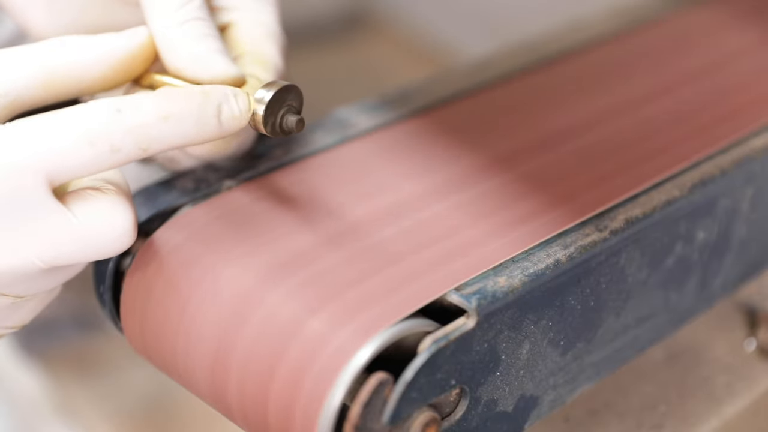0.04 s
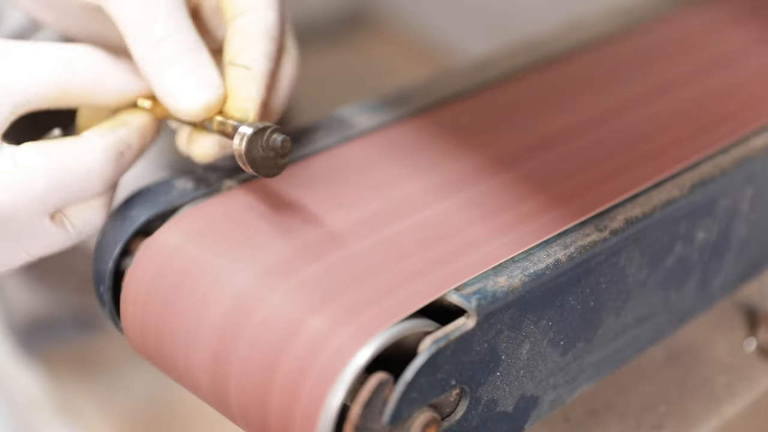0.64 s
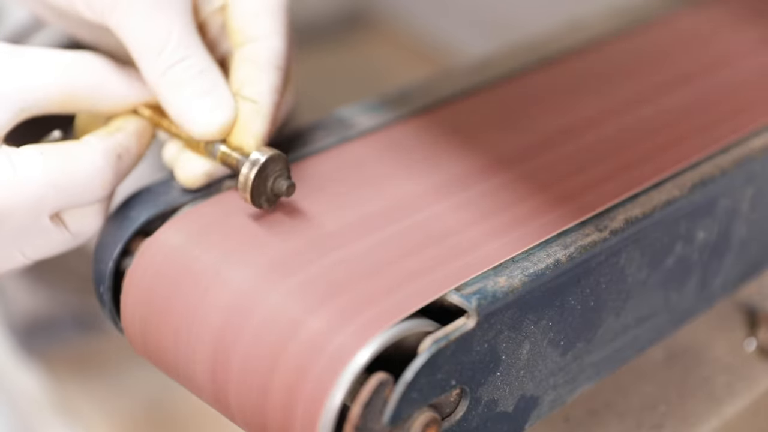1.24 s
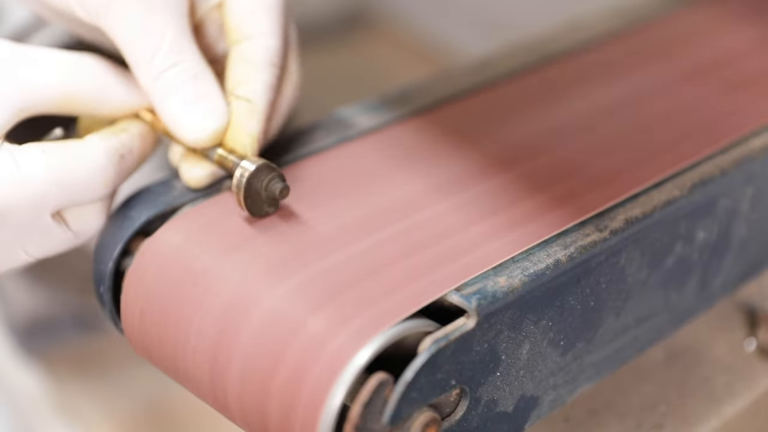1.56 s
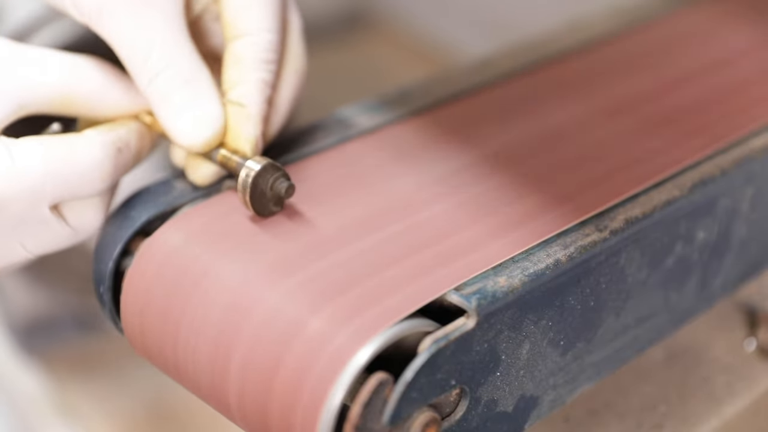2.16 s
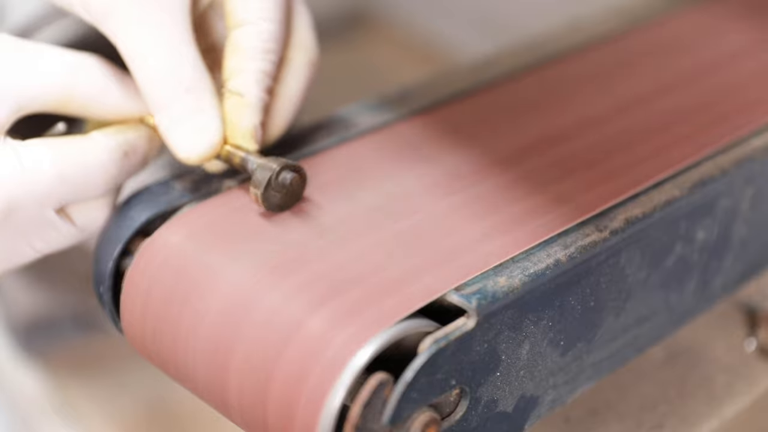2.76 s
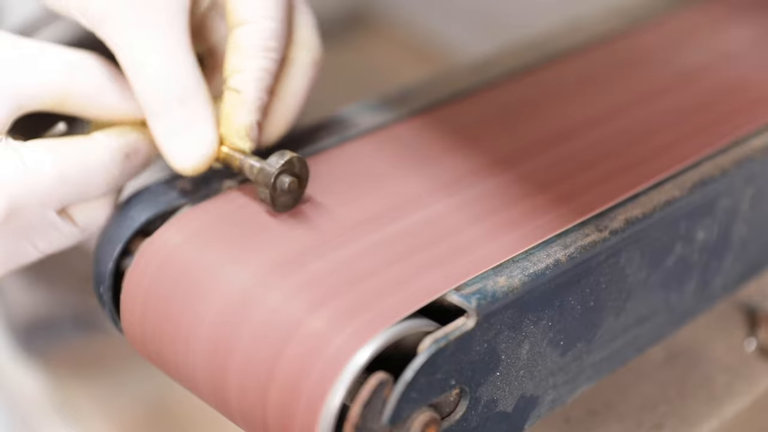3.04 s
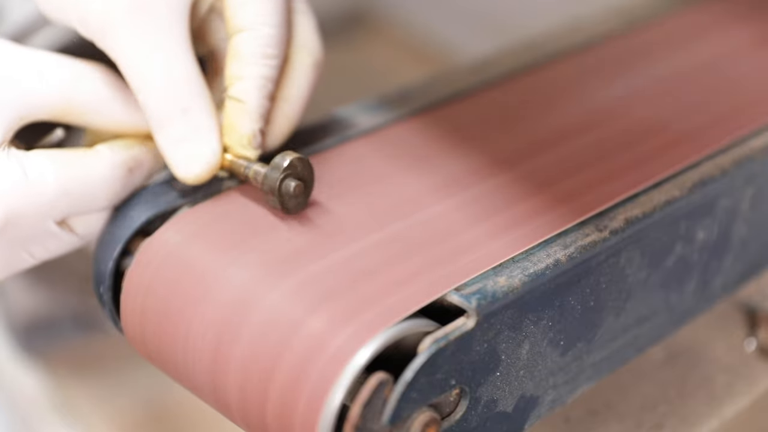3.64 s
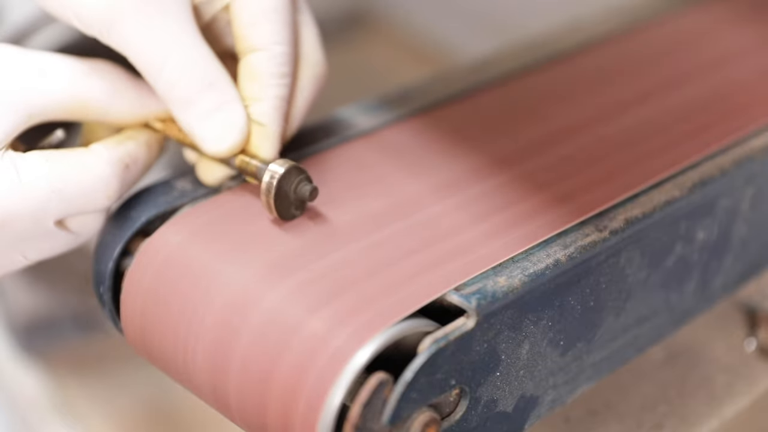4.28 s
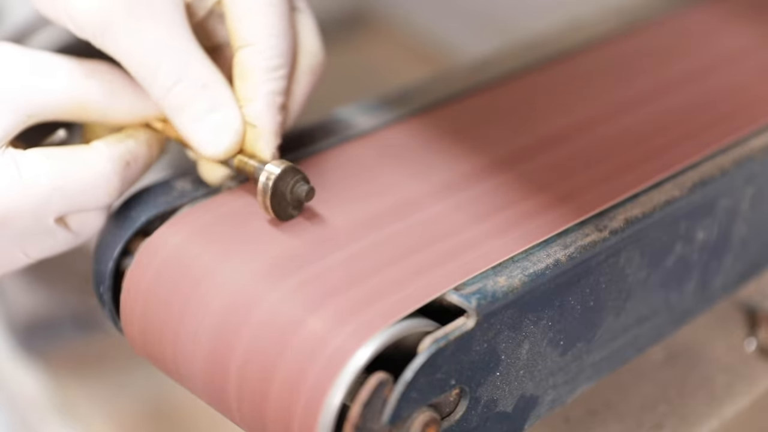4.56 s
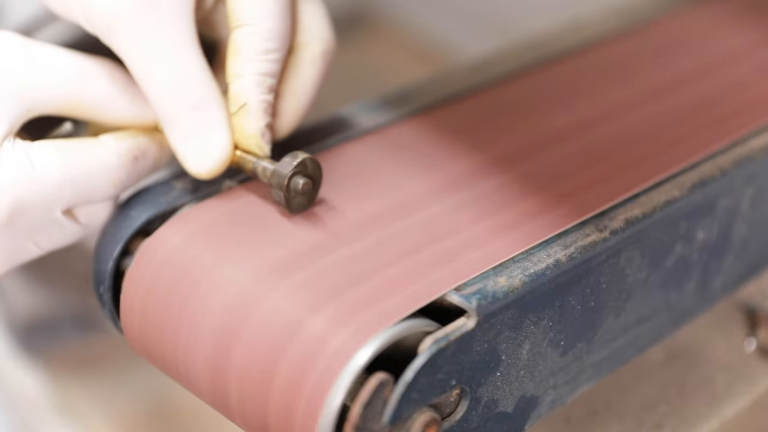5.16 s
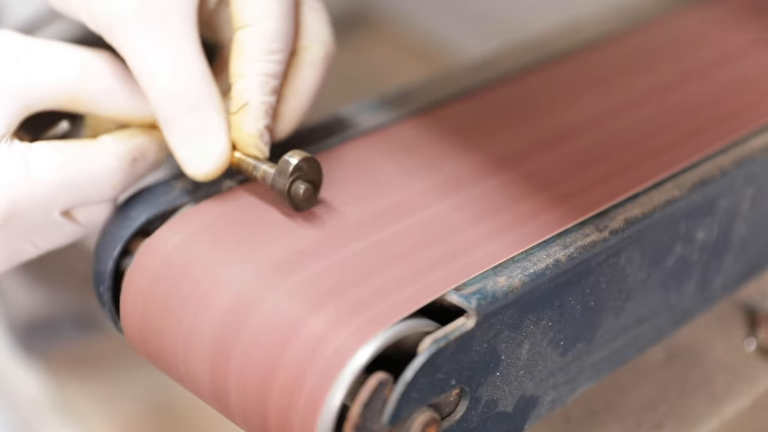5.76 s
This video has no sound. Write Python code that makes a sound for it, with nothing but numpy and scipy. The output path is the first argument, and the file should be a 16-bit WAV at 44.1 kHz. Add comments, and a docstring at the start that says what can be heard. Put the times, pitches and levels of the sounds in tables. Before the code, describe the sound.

A belt sander runs with a rapid, rattling knock over a rushing belt, then a small brass part grinds against it with a bright hiss.

```python
"""Knocking flaps, about eight a second, from the slack drive belt of a bench belt sander in a small workshop.
Each flap is a short run of knocks in step with the drum; they thump the frame and clack the steel guard,
and a loose fitting chinks after them. Under this the sanding belt rushes over rollers and platen.
From about 2.3 s a small brass part is held on the belt and turned; grit scrapes it with a bright hiss."""
import sys
import numpy as np
from scipy import signal
from scipy.fft import rfft, irfft, next_fast_len
from scipy.io import wavfile

SR = 44100
rng = np.random.default_rng(int(sys.argv[2]) if len(sys.argv) > 2 else 0)


def to_wav(sig):
    """Store sig (one row per channel, or 1-D mono) as 16-bit WAV at the path in sys.argv[1].

    Samples outside -1..1 are clipped; the rate is SR.
    """
    pcm = np.clip(np.atleast_2d(sig), -1, 1) * 32767
    pcm = np.round(pcm).astype(np.int16)
    wavfile.write(sys.argv[1], SR, pcm.T)  # frames by channels


N = 265261
TIME_S = np.arange(N) / SR
LAP_HZ, DRUM_HZ, IDLER_HZ = 8.2, 21.04, 116.7  # turn rates: belt, drum, small roller

# steel guard and platen resonances: freq_hz, width_hz, boost_db
STEEL_PEAKS = [(676, 29, 5), (724, 27, 8), (791, 22, 5), (937, 34, 11), (982, 37, 7), (1028, 34, 9),
               (1135, 60, 5), (1253, 25, 4), (1410, 52, 5), (1557, 28, 5), (1775, 28, 5), (1974, 30, 3),
               (2578, 90, 3), (2699, 22, 5), (2848, 84, 5), (2978, 57, 7), (3194, 90, 5), (3462, 38, 6),
               (3626, 28, 11), (3880, 55, 6), (4194, 70, 4), (4846, 90, 7)]


def drive_blows(end_db=-8, clear_db=-8.5, pull=.145):
    """The drum times the knocks, the slack belt's swing sets their force. Returns start_s, level_db."""
    # drive belt flaps: middle_s, length_s, strength_db
    flaps = [(0.043, 0.062, -17), (0.169, 0.073, -16), (0.312, 0.062, -19.5), (0.426, 0.049, -16.5),
             (0.552, 0.042, -13), (0.653, 0.034, -15), (0.771, 0.11, -18), (0.923, 0.036, -14.5),
             (1.022, 0.074, -15.5), (1.157, 0.11, -19), (1.284, 0.049, -20.5), (1.4, 0.075, -16.5),
             (1.546, 0.06, -17.5), (1.686, 0.04, -15.5), (1.797, 0.061, -15), (1.939, 0.034, -12),
             (2.04, 0.065, -18), (2.163, 0.15, -19.5), (2.301, 0.11, -19.5), (2.414, 0.031, -9.5),
             (2.53, 0.03, -20), (2.659, 0.066, -19.5), (2.784, 0.057, -16), (2.89, 0.037, -19),
             (3.007, 0.081, -24), (3.114, 0.1, -19), (3.243, 0.095, -24.5), (3.363, 0.056, -14.5),
             (3.487, 0.025, -18), (3.598, 0.039, -14), (3.72, 0.02, -19.5), (3.844, 0.093, -24),
             (3.948, 0.044, -20), (4.059, 0.083, -19), (4.167, 0.05, -17.5), (4.299, 0.046, -19),
             (4.415, 0.078, -21.5), (4.512, 0.066, -19.5), (4.612, 0.06, -19), (4.736, 0.075, -18),
             (4.875, 0.04, -19), (4.981, 0.11, -25), (5.102, 0.038, -22), (5.191, 0.068, -22),
             (5.313, 0.14, -18.5), (5.432, 0.078, -21.5), (5.544, 0.051, -23), (5.671, 0.033, -23),
             (5.883, 0.083, -18), (6.008, 0.1, -19)]
    # two knocks per drum turn: offset_s, accent_db
    turn_knocks = [(.0071, 1.5), (0.0265, -5)]
    middle_s, length_s, strength_db = np.transpose(flaps)
    turns_s = np.arange(0, N / SR + 1 / DRUM_HZ, 1 / DRUM_HZ)
    start_s, level_db = [], []
    for offset_s, accent_db in turn_knocks:
        due_s = turns_s + offset_s
        nearest = abs(due_s[:, None] - middle_s).argmin(1)
        to_middle_s = middle_s[nearest] - due_s
        swing_db = end_db * (2 * to_middle_s / length_s[nearest]) ** 2
        miss_db = 2 * np.minimum(swing_db - clear_db, 0)  # a small swing clears the frame
        start_s.append(due_s + pull * to_middle_s)
        level_db.append(strength_db[nearest] + accent_db + swing_db + miss_db)
    return np.concatenate(start_s), np.concatenate(level_db)


def knocks(cushion_s=0.0034, mode_scatter=0.42):
    """Each knock thumps the frame modes, the upper ones in a changing mix, and clacks the guard."""
    # frame modes: freq_hz, level_db, t60_s
    frame_modes = [(78, -9, 0.099), (164, -9.5, 0.39), (173.3, 2.5, 0.14), (228.5, -4, 0.17),
                   (255, -3, 0.11), (293.2, -3, 0.1), (310, -32, 0.027), (434, -18.5, 0.15),
                   (454.7, -11, 0.32), (535, -23, 0.12)]
    # guard spectrum: freq_hz, gain_db
    clack_colour = [(200, -41), (400, 5.5), (600, -2.5), (900, -4), (1300, 0), (1850, 2.5), (2350, -3),
                    (3100, -17.5), (4500, -19.5), (5500, -29.5), (9000, -42), (16000, -44)]
    start_s, level_db = drive_blows()
    t = np.arange(SR // 4) / SR
    modes = np.array([amp(db - 60 * t / t60) * np.cos(2 * np.pi * hz * t) for hz, db, t60 in frame_modes])
    modes *= 1 - 0.29 * np.exp(-t / cushion_s)  # rubber cushions the blow
    modes = butterworth(modes, [85, 620], "bandpass")
    upper = np.transpose(frame_modes)[0] > 200
    thumps = np.zeros(N)
    for s, db in zip(start_s, level_db):
        weights = 1 + mode_scatter * upper * rng.standard_normal(len(modes))
        add(thumps, s, -amp(db) * weights @ modes)
    buzz = chatter(start_s, level_db, rise_s=0.00057, t60_s=0.16)
    return amp(-4.5) * thumps + amp(-1) * body(buzz, clack_colour, STEEL_PEAKS)


def chinks(lag_s=.006, scatter_db=5.5):
    """The loose fitting buzzes on its high modes after each knock, now and then loudly."""
    # loud chinks: start_s, level_db
    loud_chinks = [(0.197, -30.5), (0.3347, -26), (0.5394, -27), (0.5647, -25.5), (0.773, -31),
                   (0.937, -27.5), (1.2947, -30), (1.319, -24), (1.3928, -28.5), (1.677, -29.5),
                   (1.8193, -33.5), (1.943, -33), (2.1985, -30), (2.2933, -31), (2.3343, -24),
                   (2.6767, -27), (2.7737, -27), (3.246, -27), (3.378, -23.5), (3.487, -28.5), (5.198, -25),
                   (5.4418, -26)]
    # fitting spectrum: freq_hz, gain_db
    fitting_colour = [(1500, -30.5), (3000, 7.5), (4700, -4), (5500, -2.5), (6600, 3.5), (8300, -1),
                      (10000, 0.5), (11500, -18), (16000, -45)]
    # fitting resonances: freq_hz, width_hz, boost_db
    fitting_peaks = [(2980, 60, 8), (3626, 30, 11), (4880, 60, 8), (5930, 40, 7), (6120, 40, 10),
                     (6310, 50, 8), (7320, 55, 11), (7620, 100, 5), (8270, 45, 6), (9510, 80, 9),
                     (9850, 40, 7)]
    start_s, knock_db = drive_blows()
    level_db = knock_db - 17 + scatter_db * rng.standard_normal(len(start_s))
    contacts = np.vstack([np.c_[start_s + lag_s, level_db], loud_chinks])
    buzz = chatter(*contacts.T, rise_s=0.00095, t60_s=0.1)
    return amp(2.5) * body(buzz, fitting_colour, fitting_peaks)


def grinding(touch_s=1.96, seated_s=2.3, judder_db=1.5, tremor_db=0.73, idler_depth=.06):
    """Grains cut the brass; hand pressure sets the level, the part's angle the colour."""
    # brass on the belt: time_s, press_db, edge_db, flat_db (last two relative to press_db)
    contact = [(2.1, -43.5, 1, 1), (2.36, -35, -3.5, 3.5), (2.46, -28, -3, 2.5), (2.55, -30.5, -5.5, -3.5),
               (2.84, -35.5, -2, -1), (3.08, -29, -4, -4), (3.3, -33.5, -1.5, -6), (3.51, -38, -2, 6.5),
               (3.67, -33.5, -3, -2), (3.88, -33, 0.5, 1), (4.11, -37.5, 1, 3.5), (4.22, -34.5, 2.5, -1),
               (4.43, -32, 2, -4), (4.72, -32, 1, 0), (4.81, -33, -2, -0.5), (5.24, -34.5, 2.5, 2.5),
               (5.32, -36, -4, 5.5), (5.53, -36.5, -2.5, 7), (5.67, -40, 0, 5), (5.74, -34, 1, 1.5),
               (5.9, -35.5, -3.5, 6), (6.01, -34, 2.5, 1)]
    # spectra of scrape, edge hiss, rasp of the flat, fine grit: freq_hz, gain_db
    scrape_colour = [(4000, -16.5), (5600, -7), (6200, -1), (7250, 1), (7900, -2.5), (8600, -3),
                     (10000, -27), (16000, -22)]
    edge_colour = [(7000, -20), (8500, -15), (9100, 9), (9700, 6), (10800, 8.5), (11800, 4.5), (13000, -2),
                   (15500, -30)]
    rasp_colour = [(600, -25.5), (1200, 5.5), (2000, 2), (2600, 1.5), (3100, -3), (3700, -3), (4600, -4.5),
                   (5600, -8), (7000, -9.5), (16000, -47)]
    fizz_colour = [(4000, -4), (6000, -4), (9000, -8), (12000, 6), (13500, 5), (15500, -17)]
    # resonances of brass on belt, and of the pressed platen: freq_hz, width_hz, boost_db
    brass_peaks = [(6109, 120, 6), (6425, 150, 3), (6772, 150, 6), (7120, 130, 5), (7314, 70, 7),
                   (7700, 170, 5), (8399, 150, 4), (9105, 170, 7), (9511, 70, 7), (10050, 180, 6),
                   (10538, 70, 6), (10913, 120, 6), (11657, 170, 3)]
    platen_peaks = [(1135, 54, 6), (1403, 52, 5), (2010, 70, 6), (2540, 70, 6), (2840, 70, 5),
                    (2970, 70, 7), (3170, 90, 8), (3470, 50, 7), (3626, 30, 8), (3880, 45, 10),
                    (4170, 60, 8), (4580, 70, 5), (4860, 70, 10), (5140, 80, 6)]
    time_s, *columns = np.transpose(contact)
    press_db, edge_db, flat_db = (np.interp(TIME_S, time_s, column) for column in columns)
    touch = np.interp(TIME_S, [touch_s, seated_s], [0, 1])
    bounce = amp(judder_db * wander(hz=71.5) + tremor_db * wander(hz=17))
    throb = 1 + idler_depth * sine(IDLER_HZ)
    cuts = grit(per_s=14000, spread_db=2.5) * touch * bounce * throb * amp(press_db)
    edge_cuts, flat_cuts, fine_cuts = cuts * rng.choice([-1., 1.], (3, N))  # same grains, random signs
    scrape = body(cuts, scrape_colour, brass_peaks)
    edge = body(edge_cuts * amp(edge_db), edge_colour, brass_peaks)
    rasp = body(flat_cuts * amp(flat_db), rasp_colour, platen_peaks)
    fizz = body(fine_cuts * amp(edge_db), fizz_colour, brass_peaks)
    return amp(-0.84) * scrape + amp(-1.65) * edge + amp(1) * rasp + amp(-13.5) * fizz


def belt(repeat_share=0.32, drum_depth=0.009, idler_depth=0.084, flutter_db=1.68):
    """The running belt rushes and throbs over the rollers, drags the platen into ringing, and hisses."""
    # belt drag on the platen: time_s, level_db
    load = [(0, -41), (.5, -40), (.8, -33.5), (1.25, -31.5), (1.55, -32.5), (2.1, -28.5), (2.75, -32.5),
            (3.25, -29.5), (3.55, -26.5), (3.8, -30.5), (4.5, -27.5), (5.0, -29), (5.3, -25), (5.55, -33),
            (5.8, -23.5), (6.01, -31.5)]
    # spectra of roller rush, platen ring, grit hiss: freq_hz, gain_db
    rush_colour = [(25, -42), (45, -31), (70, -13.5), (110, -6.5), (170, 1), (280, 2.5), (370, -7.5),
                   (600, 0.5), (1100, 0), (1900, -3.5), (2700, -10.5), (4000, -23.5), (5500, -38),
                   (16000, -37.5)]
    platen_colour = [(500, -18.5), (800, -41), (950, 0), (1070, -1.5), (1270, -7), (1500, -19.5),
                     (2100, -7), (3000, -21.5), (8000, -64)]
    hiss_colour = [(2500, -8.5), (4500, 0), (5500, -5.5), (6300, 1), (7200, 3), (8300, -1.5), (9800, 1.5),
                   (11000, -0.5), (13000, -8.5), (15500, -26)]
    throb = 1 + drum_depth * sine(DRUM_HZ) + idler_depth * sine(IDLER_HZ)
    lap_bumps = np.sqrt(repeat_share) * rng.standard_normal((2, round(SR / LAP_HZ)))  # recur each lap
    roll, drag = (
        throb * (np.resize(bumps, N) + np.sqrt(1 - repeat_share) * grit(per_s=6000, spread_db=2))
        for bumps in lap_bumps)
    rush = body(roll * amp(flutter_db * wander(hz=25)), rush_colour, STEEL_PEAKS)
    drag_db = np.interp(TIME_S, *np.transpose(load)) + 1.14 * wander(hz=12)
    ring = body(drag * amp(drag_db), platen_colour, STEEL_PEAKS)
    grains = grit(per_s=12000, spread_db=2.5) * amp(0.55 * wander(hz=40))
    hiss = body(grains, hiss_colour, peaks=[(7180, 70, 2.9), (9600, 70, 2.5)])
    return amp(-25.5) * rush + ring + amp(-39) * hiss


def early_echoes(x):
    """Close hard surfaces mirror the treble and comb it into metallic peaks."""
    # echoes off guard, bench and hands: delay_s, gain_db
    echoes = [(.0021, -20), (.0047, -19), (.0069, -19), (.0093, -21)]
    treble = butterworth(x, 1900, "highpass")
    out = np.zeros(N)
    for delay_s, gain_db in echoes:
        add(out, delay_s, amp(gain_db) * treble)
    return out


def workshop(x, tail_count=3, gap_s=.006):
    """Short diffuse room tail, longest in the bass, its colour slowly and steadily shifting."""
    # room decay: freq_hz, t60_s
    decay = [(150, 0.9), (1000, 0.16), (3000, 0.087), (10000, 0.19)]
    taps = rng.standard_normal((tail_count, SR // 3)) * (np.arange(SR // 3) > gap_s * SR)
    hz, t, spectra = signal.stft(taps, SR, nperseg=256)
    t60_s = log_interp(decay, hz)[:, None]
    tails = signal.istft(spectra * amp(-60 * t / t60_s), SR, nperseg=256)[1]
    tails /= np.linalg.norm(tails[0])
    phase_rad = np.pi * (0.916 * TIME_S + np.arange(tail_count)[:, None] / tail_count)
    crossfade = np.cos(phase_rad) * np.sqrt(2 / tail_count)
    return signal.oaconvolve(butterworth(x, 450, "highpass") * crossfade, tails, axes=1)[:, :N].sum(0)


def chatter(start_s, level_db, rise_s, t60_s):
    """Each contact buzzes: a dying burst of tiny rebounds."""
    t, out = np.arange(SR // 8) / SR, np.zeros(N)
    envelope = (1 - np.exp(-t / rise_s)) * amp(-60 * t / t60_s)
    for s, db in zip(start_s, level_db):
        add(out, s, amp(db) * envelope * rng.standard_normal(len(t)))
    return out


def grit(per_s, spread_db):
    """Tiny impacts of abrasive grains, a few larger than the rest; rms 1."""
    size = amp(spread_db * np.minimum(rng.exponential(1, N), 4))
    return unit_rms(size * rng.choice([-1., 1.], N) * (rng.random(N) < per_s / SR))


def body(x, colour, peaks, fft_size=8192):
    """Rings x through a unit-energy body: broad colour plus resonances."""
    hz = np.fft.rfftfreq(fft_size, 1 / SR)
    lift = sum((amp(db) ** 2 - 1) / (1 + (2 * (hz - f) / width) ** 2) for f, width, db in peaks)
    log_gain = np.log(amp(log_interp(colour, hz))) + .5 * np.log(np.maximum(1 + lift, .1))
    minimum_phase = np.exp(np.conj(signal.hilbert(np.r_[log_gain, log_gain[-2:0:-1]])))
    ring = np.fft.ifft(minimum_phase).real[:fft_size // 2]
    return signal.oaconvolve(x, ring / np.linalg.norm(ring))[:N]


def wander(hz):
    """Random drift below about hz; rms 1."""
    bins_hz = np.fft.rfftfreq(N, 1 / SR)[:4000]
    spectrum = rfft(rng.standard_normal(8192))[:4000] / (1 + (bins_hz / hz) ** 4)
    return unit_rms(irfft(spectrum, next_fast_len(N))[:N])


def sine(hz):
    return np.sin(2 * np.pi * hz * TIME_S)


def butterworth(x, hz, kind):
    return signal.sosfilt(signal.butter(2, hz, kind, fs=SR, output="sos"), x)


def amp(db):
    return 10 ** (np.asarray(db) / 20)


def unit_rms(x):
    return x / np.sqrt(np.mean(x ** 2) + 1e-20)


def log_interp(points, hz):
    freq_hz, value = np.transpose(points)
    return np.interp(np.log(hz + 1), np.log(freq_hz), value)


def add(mix, start_s, sound):
    part = mix[max(round(start_s * SR), 0):][:len(sound)]
    part += sound[:len(part)]


def scene():
    """The sander close by, with early echoes and a little room."""
    direct = knocks() + chinks() + belt() + grinding()
    return (direct + early_echoes(direct) + amp(-15.5) * workshop(direct))[None]


def record(dry):
    """Low cut at 38 Hz, band limit at 15780 Hz."""
    band_limit = signal.firwin(801, 15780, window=("kaiser", 9), fs=SR)
    return signal.oaconvolve(butterworth(dry, 38, "highpass"), band_limit[None], "same")


dry = scene()
out = record(dry)
to_wav(out)
```